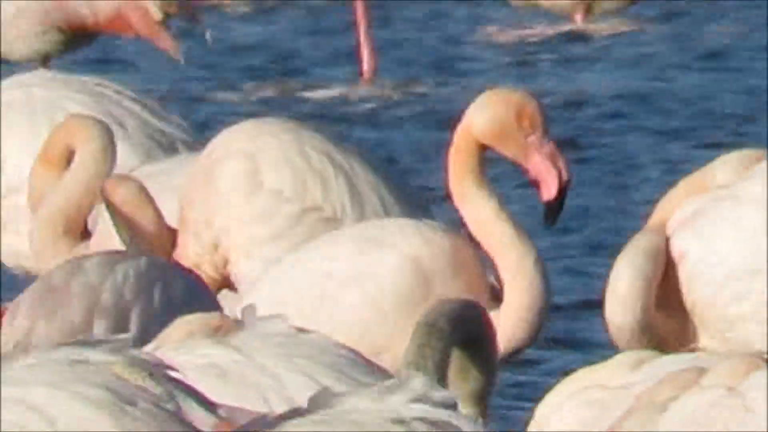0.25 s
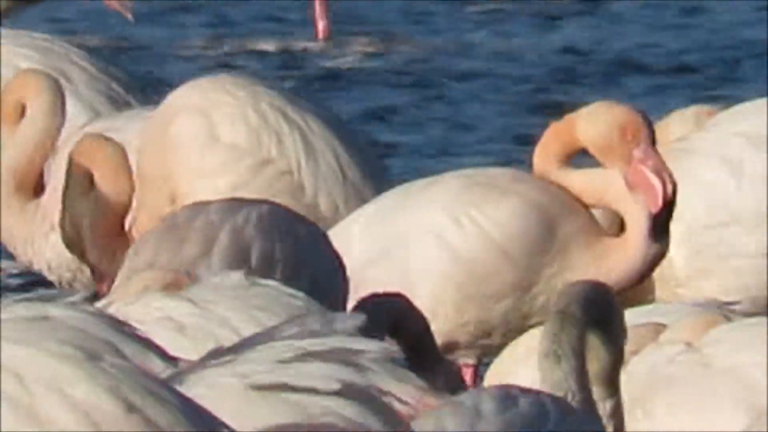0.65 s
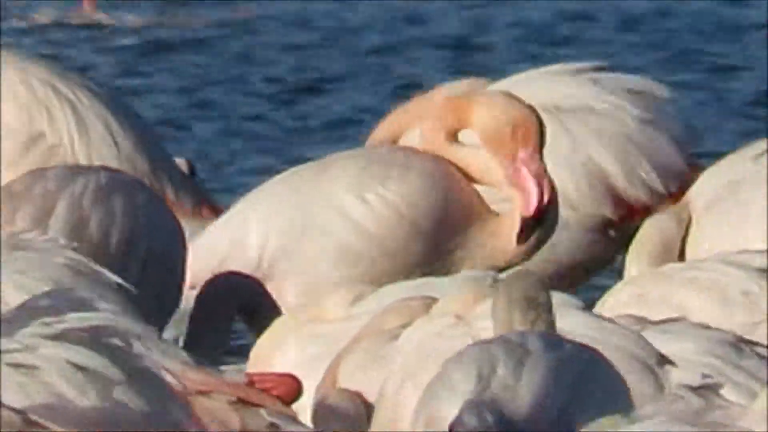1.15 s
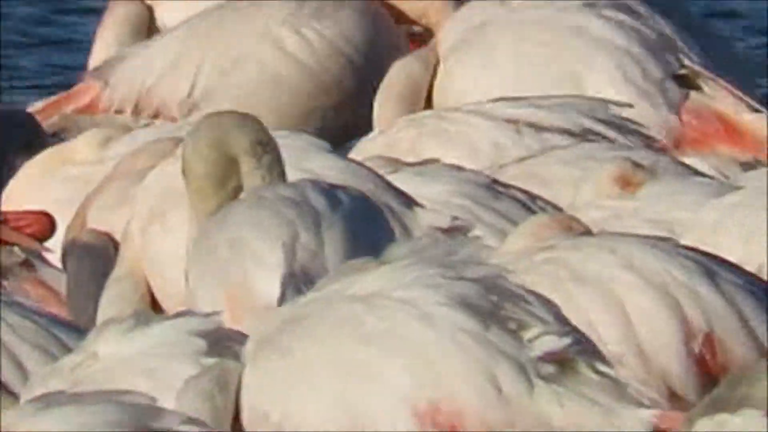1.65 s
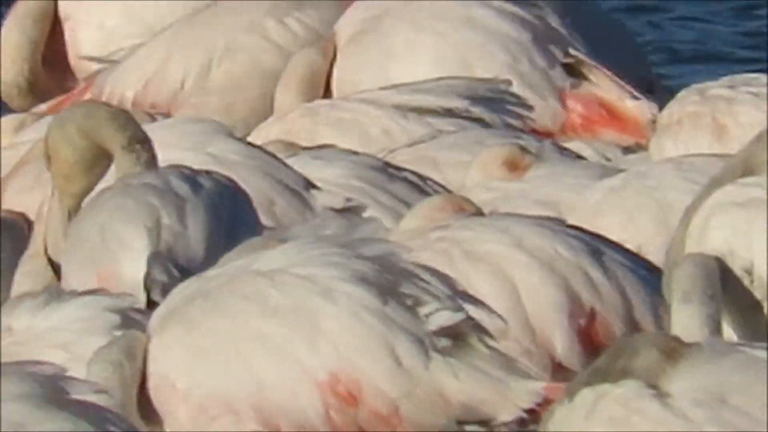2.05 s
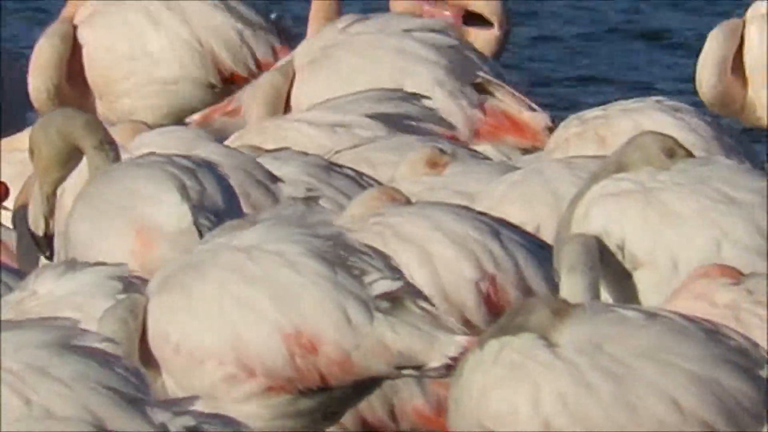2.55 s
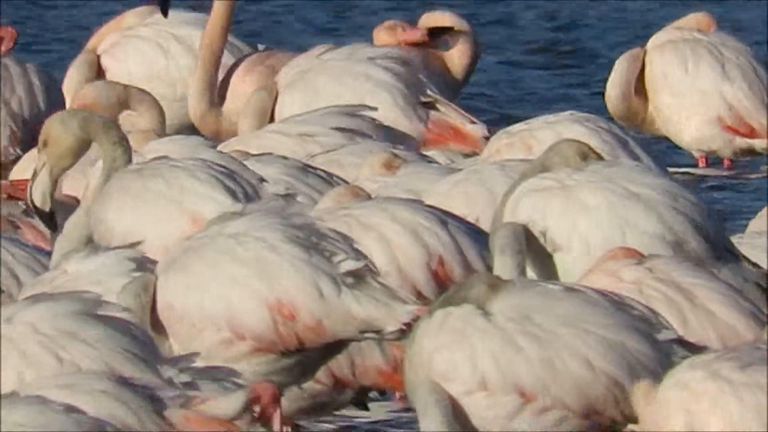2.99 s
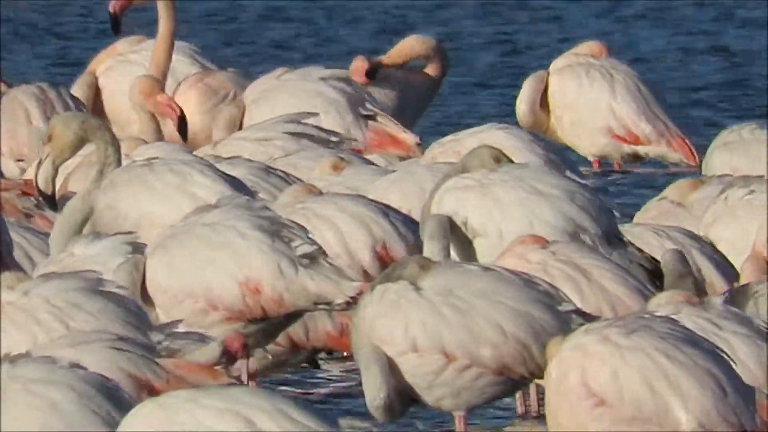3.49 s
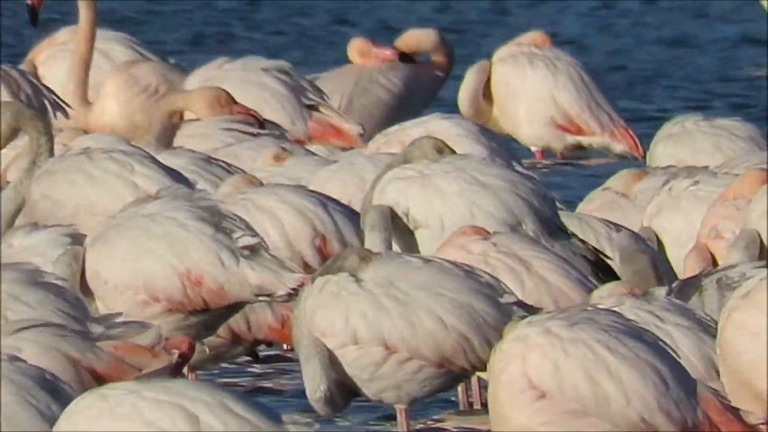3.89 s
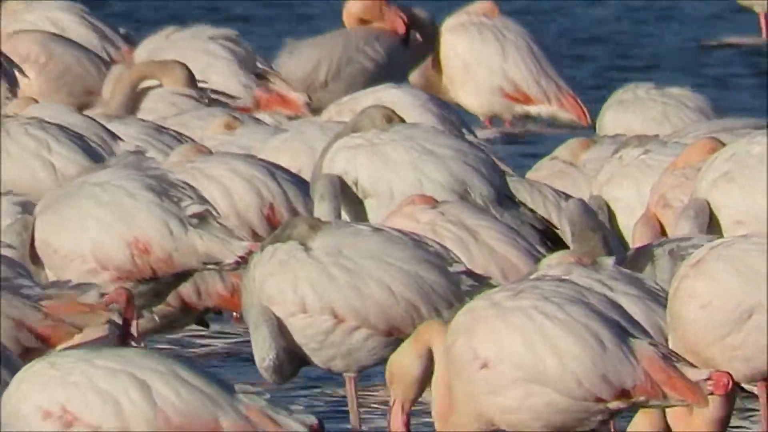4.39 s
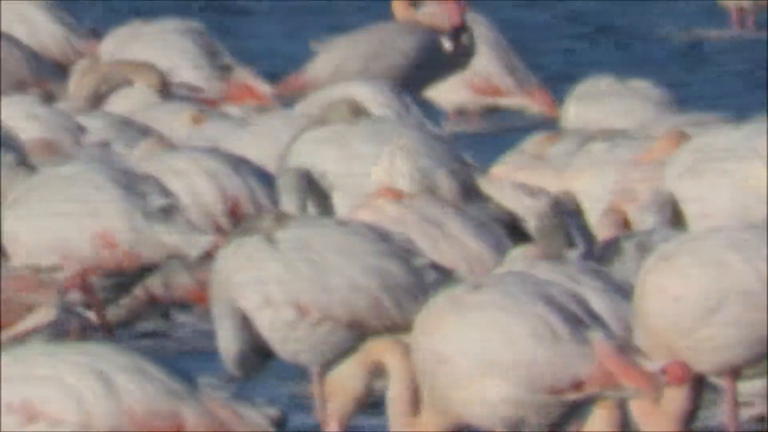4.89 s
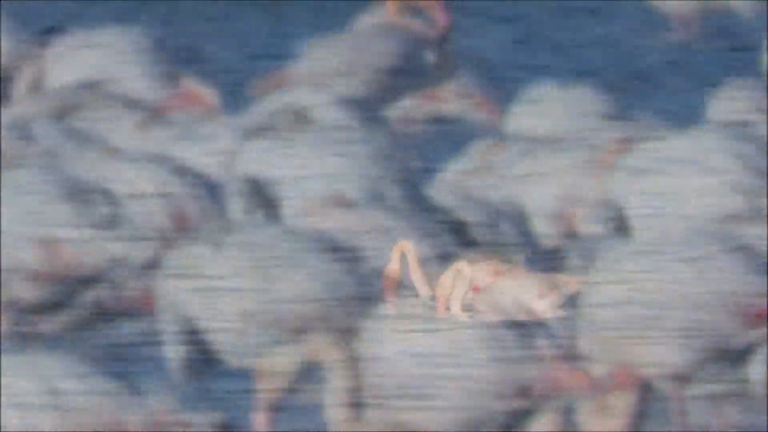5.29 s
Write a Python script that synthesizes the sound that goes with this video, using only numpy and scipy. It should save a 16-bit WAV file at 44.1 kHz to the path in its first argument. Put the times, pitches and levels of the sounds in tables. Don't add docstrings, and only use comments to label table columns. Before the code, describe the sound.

A pocket camera on a lake shore faces a crowded resting flock of flamingos, but wind striking its two microphone ports dominates everything. From 0 to 0.9 seconds, rapid gusts thud and slap, with rough roar and rasp. Longer roaring gusts follow from about 1.1 to 2.3, broken by short lulls; 2.4 to 3.0 is slacker, with low flaps. Gusts hit again at 3.0, and faint small taps appear at 3.4. Roaring swells return from 3.8 to 4.4, then ease. The bass stays narrow and central, with tiny irregular ticks from wind filtering and a thin, smooth hiss behind. At 4.72 a click, mostly left, releases a wide, hollow low rumble until 4.99, when it snaps narrow again. A crisp tap comes at 5.13, then the last hard slaps and roar from 5.2 to about 5.5. No calls or splashes are heard.

```python
import sys
import numpy as np
from scipy import signal
from scipy.fft import rfft, irfft, next_fast_len
from scipy.io import wavfile
from scipy.ndimage import uniform_filter1d, map_coordinates

SR = 44100
rng = np.random.default_rng(int(sys.argv[2]) if len(sys.argv) > 2 else 0)


def dump_mix(stems):
    frames = np.atleast_2d(stems).T
    limited = np.clip(frames, -1, 1)
    pcm = np.round(limited * 32767).astype(np.int16)
    wavfile.write(sys.argv[1], SR, pcm)


def gain_from_db(level_db):
    decades = np.asarray(level_db, float) / 20
    return 10 ** decades


N = 244314

# t/s, level of the left-right difference/dB
FILTER_OFF = [
    (4.7249, -21),
    (4.76, -15),
    (4.8, -15),
    (4.85, -12.5),
    (4.9, -13.5),
    (4.94, -11),
    (4.96, -15),
    (4.9913, -20),
]


def along(points, hz):
    f, v = np.transpose(points)
    return np.interp(np.log(hz + 1), np.log(f + 1), v)


def curves(rows):
    s, *cols = np.transpose(rows)
    return [np.interp(np.arange(N) / SR, s, c) for c in cols]


def wobble(rate):
    knots = rng.standard_normal((2, int(N * 200 / SR)))
    return np.array([map_coordinates(k, [np.arange(N) * rate / SR]) for k in knots])


def coloured(x, points):
    m = next_fast_len(N + 8192)
    gain = gain_from_db(along(points, np.fft.rfftfreq(m, 1 / SR)))
    return irfft(rfft(x, m) * gain, m)[..., :N]


def noise(points):
    x = coloured(rng.standard_normal((2, N)), points)
    return x / x.std()


def lumpy(depth_db):
    g = gain_from_db(depth_db)
    return g / np.sqrt(np.mean(g ** 2))


def wind():
    # f/Hz, level/dB
    rumble_colour = [(15, -20.5), (40, -8), (70, 6.5), (105, 11), (140, 10.5), (250, -41)]
    thud_colour = [(40, -51), (90, -19.5), (140, -5), (230, 3), (400, 1), (485, 0), (510, -10.5),
                   (750, -21), (1500, -45), (4000, -86)]
    roar_colour = [(150, -41), (350, 2.5), (520, 3), (750, 1), (1050, -7.5), (1500, -20), (3000, -56.5),
                   (6000, -100)]
    rasp_colour = [(400, -32.5), (900, 1.8), (1300, 0), (1700, -8), (2100, -14), (3000, -31), (4300, -46.5),
                   (8000, -69)]
    thud_db, roar_db = gusts()
    rasp_db = follows(-32.5, per_speed=2.44, per_push=-0.27)
    rumble_db = follows(-46, per_speed=-0.38, per_push=0.7)

    swells = np.array([wobble(30)[0], wobble(70)[0]])
    big, small = 1.42 * np.tanh(swells / 1.86)
    eddies, drag = puffs()
    drag = drag / np.hypot(gain_from_db(roar_db), gain_from_db(thud_db))

    rumble = gain_from_db(rumble_db) * lumpy(4.2 * wobble(18)) * noise(rumble_colour)
    thud = gain_from_db(thud_db + 0.25) * lumpy(2.2 * big + 0.28 * wobble(40)) * noise(thud_colour)
    roar_lumps = lumpy(0.92 * big + 3 * small + 1.7 * wobble(90)) + 0.39 * drag
    roar = gain_from_db(roar_db - 0.25) * roar_lumps * noise(roar_colour)
    rasp_lumps = lumpy(0.78 * big + 3.6 * small + 2.5 * wobble(150)) + 0.58 * drag
    rasp = gain_from_db(rasp_db - 0.5) * rasp_lumps * noise(rasp_colour)
    return rumble + thud + roar + rasp + eddies


def gusts():
    # start t/s, length/s, push level/dB, air speed as roar level/dB
    gust_list = [(0.062, 0.17, -22, -31), (0.216, 0.08, -33.5, -20.5), (0.227, 0.073, -18, -43),
                 (0.45, 0.021, -21.0, -21.5), (0.498, 0.032, -18.5, -22), (0.595, 0.037, -17, -25),
                 (0.647, 0.071, -16.5, -18.5), (0.747, 0.16, -44.5, -14.5), (0.832, 0.17, -23.5, -20.5),
                 (1.103, 0.067, -19.0, -23), (1.179, 0.44, -24.5, -18.0), (1.509, 0.25, -24, -30),
                 (1.661, 0.31, -28.5, -16), (1.906, 0.092, -19.5, -25), (2.099, 0.201, -22, -16.5),
                 (2.411, 0.15, -23, -30.0), (2.661, 0.156, -24, -34.5), (3.013, 0.073, -17, -37),
                 (3.051, 0.09, -22, -16.5), (3.136, 0.16, -21, -20.5), (3.476, 0.03, -22.5, -31),
                 (3.509, 0.12, -23, -22), (3.797, 0.2, -21.5, -17.5), (3.928, 0.21, -40, -16),
                 (4.108, 0.27, -24.5, -15.5), (4.465, 0.238, -30.5, -39), (4.77, 0.178, -29.5, -37.5),
                 (5.203, 0.03, -21, -23.0), (5.288, 0.03, -17, -26.5), (5.339, 0.18, -16, -23)]
    push_rise, push_fall, speed_rise, speed_fall = 193, 250, 580, 330
    arch_db = 7
    calm_push_db, calm_speed_db = -34.5, -47.5

    t = np.arange(0, N / SR, .002)
    start, length, push_db, speed_db = np.transpose(gust_list)[..., None]
    early = np.maximum(start - t, 0)
    late = np.maximum(t - start - length, 0)
    across = np.clip(2 * (t - start) / length - 1, -1, 1)
    push = push_db - push_rise * early - push_fall * late
    speed = speed_db - arch_db * across ** 2 - speed_rise * early - speed_fall * late

    def total(db, calm_db):
        return 10 * np.log10(np.sum(gain_from_db(db) ** 2, axis=0) + gain_from_db(calm_db) ** 2)

    return curves(np.c_[t, total(push, calm_push_db), total(speed, calm_speed_db)])


def follows(db, per_speed, per_push):
    push_db, speed_db = gusts()
    reference_db = -20
    return db + per_speed * (speed_db - reference_db) + per_push * (push_db - reference_db)


def puffs():
    # t/s, peak level/dB, width/s, f/Hz
    slaps = [(0.22, -6, 0.0056, 451), (0.232, -7, 0.005, 336.6), (0.26, -2, 0.0028, 347),
             (0.456, -5, 0.0023, 680), (0.604, -5.5, 0.0059, 345), (0.612, -6, 0.0071, 460.4),
             (0.676, -7.5, 0.005, 522), (0.694, -7.5, 0.0052, 384.4), (0.856, -3.5, 0.002, 802),
             (1.133, -4.5, 0.0036, 465), (1.17, -6, 0.0043, 342), (1.373, -10, 0.0045, 809),
             (1.385, -4.5, 0.0035, 417), (1.415, -8, 0.0018, 748), (1.521, -7.5, 0.0054, 425),
             (1.712, -6, 0.0038, 486), (2.147, -10, 0.0016, 572), (3.018, -10.5, 0.0085, 319.4),
             (3.058, -2.5, 0.0017, 385), (3.085, -5.5, 0.0033, 420), (3.11, -5.5, 0.0046, 523),
             (3.888, -6.5, 0.0094, 638), (4.026, -8.5, 0.0018, 653), (4.18, -10.5, 0.0033, 810),
             (4.3, -7.5, 0.0043, 757), (5.202, -5, 0.0059, 418), (5.294, -1.5, 0.005, 335.6),
             (5.384, -1, 0.0055, 430.6), (5.423, -5, 0.005, 442), (5.462, -5.5, 0.0018, 326)]
    # t/s, peak level/dB
    slow_flaps = [(0.077, -10.5), (0.126, -6.5), (0.299, -9), (0.325, -6), (0.404, -16), (0.419, -12),
                  (0.977, -9.5), (1.104, -14.5), (1.692, -5.5), (1.93, -10.5), (2.277, -14), (2.308, -16.5),
                  (2.413, -4.5), (2.498, -11.5), (2.528, -6.5), (2.656, -10), (2.723, -13), (2.832, -18),
                  (2.955, -10), (3.284, -10), (3.435, -16), (3.482, -12.5), (3.643, -13), (3.794, -4),
                  (4.466, -17), (4.607, -23.5), (4.637, -12), (4.79, -13.5), (4.833, -12.5), (5.053, -16.5)]
    flap_width_s, flap_hz, flap_scatter = .005, 355, 0.1

    eddies = list(slaps)
    for s, db in slow_flaps:
        eddies.append((s, db, flap_width_s, flap_hz * np.exp(flap_scatter * rng.standard_normal())))

    half = SR // 20
    t = np.arange(-half, half) / SR
    out = np.zeros((3, N + SR))
    for s, db, length, hz in eddies:
        turn = rng.uniform(0, 2 * np.pi, (2, 1))
        env = gain_from_db(db - 4.0 - 20 * (t / max(length, .002)) ** 2)
        cycles = hz * t * (1 - 8 * t)
        pressure = np.sin(2 * np.pi * cycles + turn)
        first = round(s * SR)
        out[:, first:first + len(t)] += env * np.vstack([pressure, np.ones(len(t))])
    return out[:2, half:N + half], out[2, half:N + half]


def released():
    # f/Hz, level/dB
    wide_colour = [(25, -14.5), (60, -4.5), (130, 0.5), (250, 2.5), (450, -6), (560, -10.5), (750, -22.5),
                   (1050, -31.5), (1500, -49), (3000, -77)]
    switch_s = .0006
    t = np.arange(N) / SR
    nearest_edge = np.minimum(t - FILTER_OFF[0][0], FILTER_OFF[-1][0] - t)
    is_off = np.clip(nearest_edge / switch_s, 0, 1)
    loudness = gain_from_db(curves(FILTER_OFF)[0]) * is_off
    shared, opposite = loudness * lumpy(2.0 * wobble(38)) * noise(wide_colour)
    deep_shared = coloured(shared, [(40, -19), (130, -10), (300, -27.5)])
    return np.array([deep_shared - 0.035 * opposite, opposite])


def folded(difference):
    # f/Hz, level against the centre/dB
    fold_colour = [(100, -58), (200, -44.5), (300, -25.1), (450, -21), (750, -15), (1500, -7.5), (2100, -4),
                   (3000, -0.9), (4500, 4), (15000, 2)]
    return coloured(difference, fold_colour)


def seams(loudness):
    # t/s, centre level/dB, left-right difference level/dB
    loud_seams = [(0.223, -46, -60), (0.266, -53, -38.5), (0.458, -46, -45), (0.661, -46.5, -38),
                  (0.671, -45, -35), (0.693, -40, -37), (0.842, -45.5, -37.5), (1.215, -46.5, -61),
                  (1.322, -45.5, -52.5), (1.674, -39.5, -47), (1.706, -42.5, -43.5), (1.727, -40, -42),
                  (1.866, -43.5, -59), (2.111, -44.5, -45), (2.175, -41.5, -50), (2.218, -41.5, -43),
                  (3.05, -43, -45.5), (3.103, -45.5, -56), (3.199, -42, -57), (3.221, -44, -59),
                  (3.594, -47, -40), (3.85, -41.5, -42), (3.882, -63, -36.5), (3.957, -42, -53.5),
                  (4.277, -41.5, -54), (4.373, -45.5, -61.5), (4.725, -53.5, -47), (5.365, -45.5, -43.5),
                  (5.45, -41, -40.5), (5.471, -45.5, -41)]
    block_s, seam_at = 512 / 48000, .94
    ordinary_db = -22

    count = int(N / SR / block_s)
    at = np.round((np.arange(count) + seam_at) * block_s * SR).astype(int)
    size = gain_from_db(ordinary_db) * loudness[at] * rng.standard_normal((2, count))
    for s, centre_db, difference_db in loud_seams:
        peak = gain_from_db(np.array([centre_db, difference_db]) + 12.5)
        size[:, round(s / block_s - seam_at)] = peak * rng.choice([-1, 1], size=2)
    spikes = np.zeros((2, N))
    spikes[:, at] = size[0] + size[1], size[0] - size[1]
    return coloured(spikes, [(200, -10.5), (1000, 10.0), (3000, 16.5), (6000, 2.5), (10000, -9), (15000, -19)])


def spits():
    # t/s, peak level/dB, width/s, f/Hz
    bursts = [
        (.457, -20, .004, 1750),
        (.697, -30, .0035, 2100),
        (1.458, -29, .005, 2400),
        (4.277, -30, .0045, 2300),
        (5.398, -35, .0055, 1940),
    ]
    t = np.arange(N) / SR
    out = np.zeros(N)
    for s, db, width, hz in bursts:
        band = [(hz / 4, -70), (hz * 0.58, -6), (hz, .1), (hz * 1.21, -13), (hz * 2.16, -40), (hz * 5, -90)]
        out += gain_from_db(db - 20 * ((t - s) / width) ** 2) * noise(band)[0]
    return out


def taps():
    # t/s, peak level/dB, f/Hz, time to fall 60 dB/s
    rings = [
        (3.377, -53.5, 2770, .02),
        (3.39, -47, 3020, .012),
        (3.393, -52, 1965, 0.034),
        (5.135, -34, 2190, 0.0057),
        (5.1362, -47, 4640, 0.0053),
        (5.1378, -39.5, 2020, 0.0074),
    ]
    t = np.arange(SR // 10) / SR
    out = np.zeros(N + SR)
    for s, db, hz, t60 in rings:
        first = round(s * SR)
        out[first:first + len(t)] += gain_from_db(db - 60 * t / t60) * np.sin(2 * np.pi * hz * t)
    return out[:N]


def shore():
    # f/Hz, level/dB
    hiss_colour = [(1000, -9), (2000, 13.5), (4000, 0.3), (6000, -5), (8600, -16), (11300, -23),
                   (11900, -35.5), (14000, -59)]
    hiss_db = follows(-66.5, per_speed=.15, per_push=.03)
    return gain_from_db(hiss_db + 4.5) * lumpy(1.8 * wobble(27)) * noise(hiss_colour)


def scene():
    centre, difference = wind() + shore()
    shared, opposite = released()
    centre = centre + spits() + taps() + shared
    difference = folded(difference) + opposite
    return np.array([centre + difference, centre - difference])


def low_pass(x):
    return signal.sosfilt(signal.butter(12, 15600, fs=SR, output="sos"), x)


def record(dry):
    # f/Hz, level/dB
    capsule = [(10500, 0.04), (11500, -2.3), (12200, -5), (15000, -8.5)]
    push_db, speed_db = gusts()
    rise = uniform_filter1d(np.gradient(speed_db) * SR, size=SR // 25)
    rise = np.clip(rise, 0, 200)
    runs_db = 0.013 * rise + 1.5 * wobble(12)[0]
    wind_size = np.hypot(gain_from_db(speed_db), gain_from_db(push_db - 6.5))
    x = dry + seams(gain_from_db(runs_db) * wind_size)
    x = coloured(x, capsule)

    click_db = -31
    x[:, round(FILTER_OFF[0][0] * SR)] += gain_from_db(click_db) * np.array([1, .15])
    x = x / (1 + np.abs(x / 0.97) ** 6) ** (1 / 6)
    return low_pass(x)


dry = scene()
out = record(dry)
dump_mix(out)
```